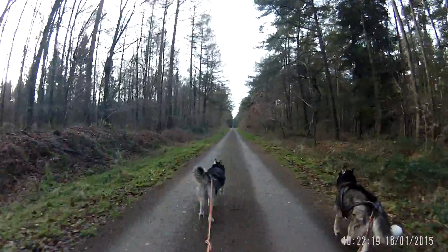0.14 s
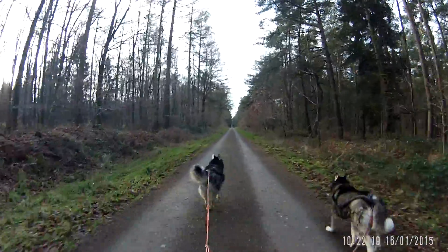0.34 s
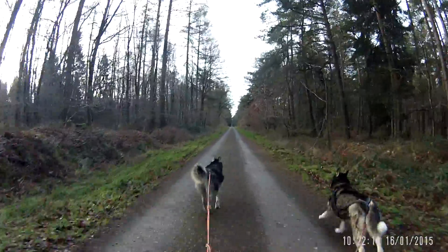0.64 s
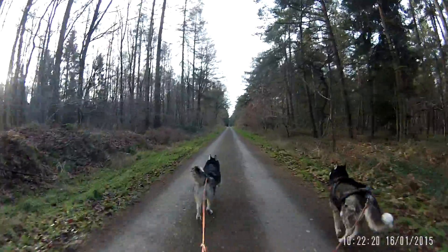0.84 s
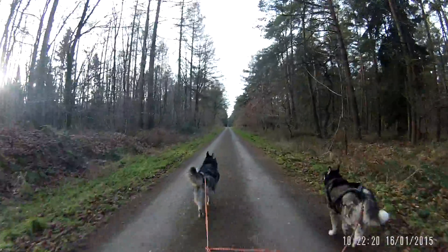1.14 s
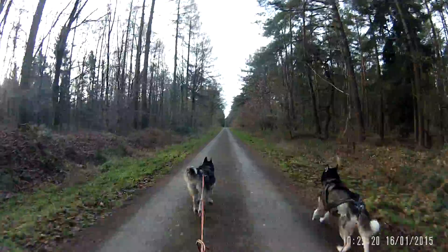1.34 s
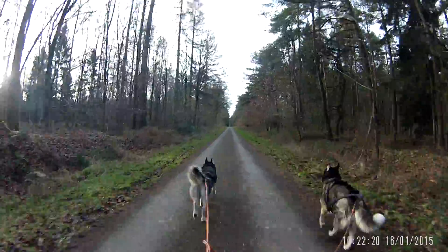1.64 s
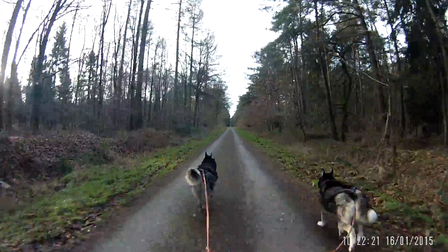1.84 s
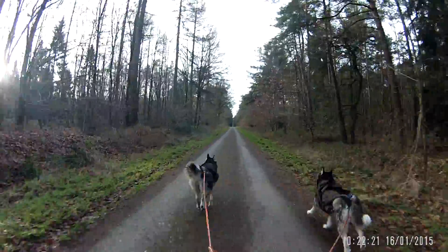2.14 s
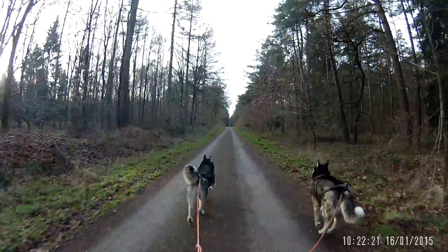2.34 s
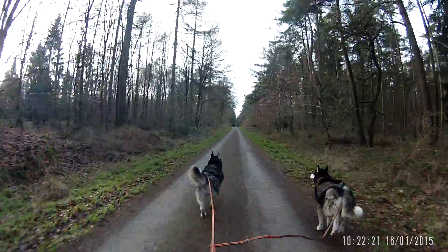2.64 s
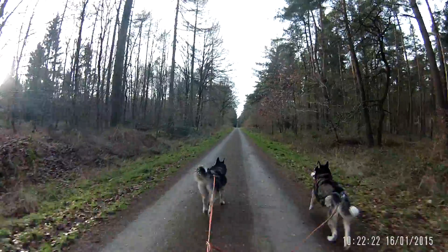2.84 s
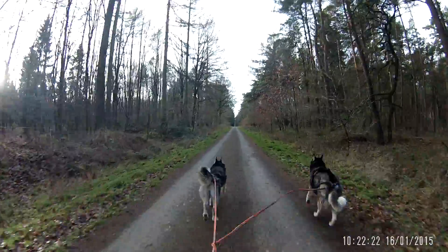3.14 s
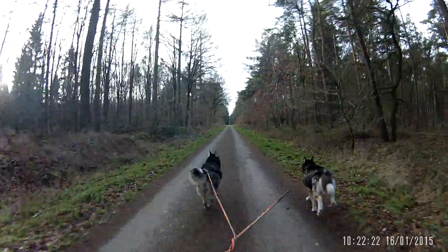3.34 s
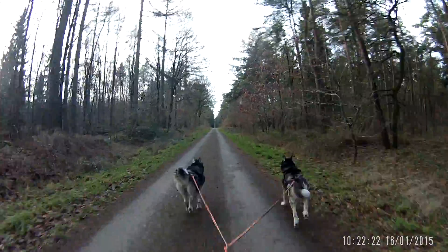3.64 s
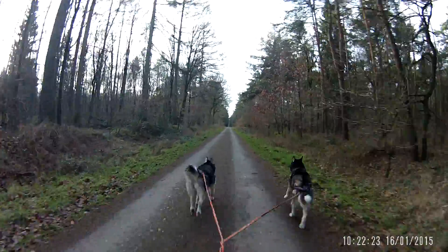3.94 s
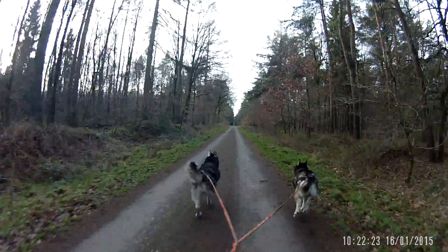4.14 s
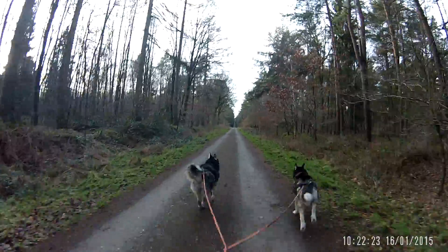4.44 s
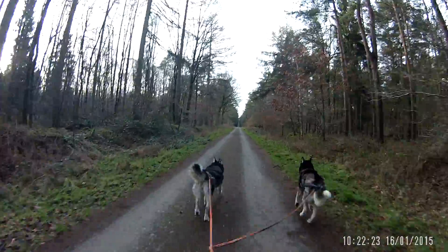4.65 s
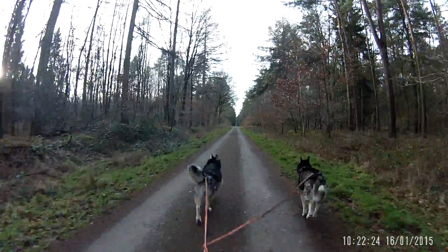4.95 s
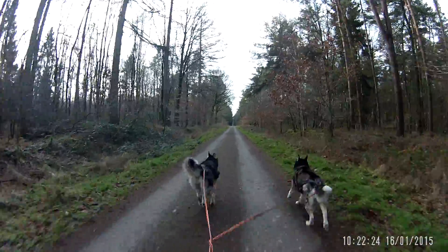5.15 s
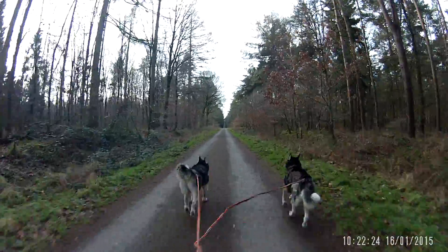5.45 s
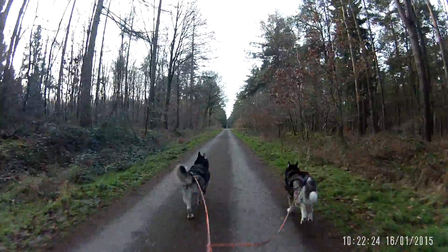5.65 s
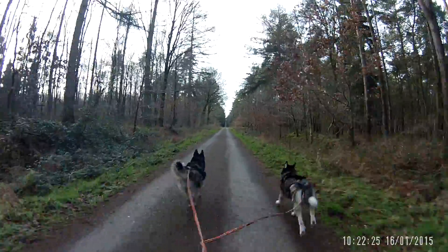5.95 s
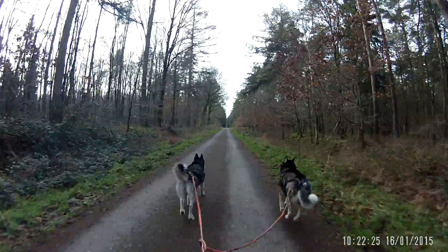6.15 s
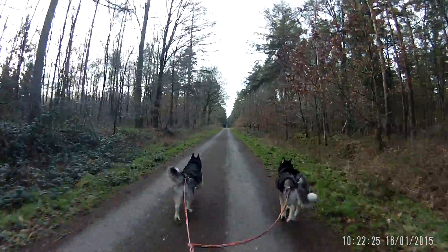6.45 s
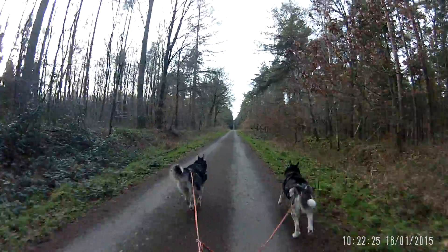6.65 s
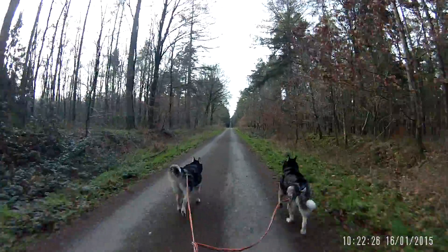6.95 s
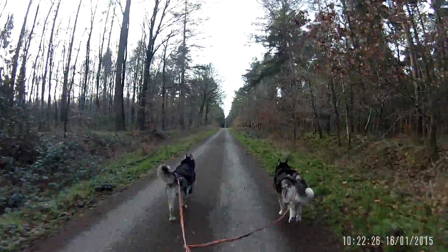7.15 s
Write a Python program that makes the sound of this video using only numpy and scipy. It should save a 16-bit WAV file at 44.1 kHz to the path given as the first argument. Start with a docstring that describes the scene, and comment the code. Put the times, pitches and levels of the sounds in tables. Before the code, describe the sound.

A scooter rolls along a gravelly track with a steady low frame rumble, constant loose plastic rattling, and occasional sharp stone pops.

```python
"""A kick scooter, pulled by two dogs along a fine gravel forest track: its frame rumbles as damped modes
shaken by random pebble contacts and timed bumps. Short pulses make grit, stones and crushed clumps.
A loose camera housing knocks through a damped shell spectrum; flung chips and a tow line clip ring metal
modes; shaped noise makes the wind. The camera port adds a null, and the camera hiss and a thin whine."""
import sys
import numpy as np
from scipy import signal
from scipy.fft import rfft, irfft
from scipy.io import wavfile
from scipy.ndimage import uniform_filter1d, map_coordinates

SR = 44100
rng = np.random.default_rng(int(sys.argv[2]) if len(sys.argv) > 2 else 0)


def to_wav(s):
    """Save 16-bit WAV."""
    ch = np.atleast_2d(s).T  # columns
    pcm = np.round(np.clip(ch, -1, 1) * 32767)  # PCM
    wavfile.write(sys.argv[1], SR, pcm.astype(np.int16))


N = 321930
TIME_S = np.arange(N) / SR

# track under the tyres: (time [s], relative rumble level [dB], relative crunch level [dB])
TRACK_STATE = [(0.02, -31.5, -49), (0.57, -30.5, -50.5), (1.72, -29, -48.5), (1.9, -30.5, -52),
               (4.68, -30, -50), (4.87, -30.5, -52.5), (5.82, -31, -52), (6.08, -30, -48.5),
               (6.32, -31, -52.5), (7.3, -31, -51.5)]
# modes of frame, tyres and mount: (frequency [Hz], width [Hz], relative level [dB])
FRAME_MODES = [(130.5, 4.3, -9.5), (142, 23, -10), (172.6, 11.8, -0.5), (266.8, 15.2, -2.5),
               (291.9, 30.5, -2), (312.2, 27.6, -2), (360, 23, -8.5), (436.5, 40, -9), (525, 80, -21.5)]
# hollows and humps that jolt the frame: (time [s], relative peak level [dB])
BUMPS = [(0.002, -12), (0.052, -19.5), (0.742, -19), (0.779, -13), (1.266, -15), (1.395, -16),
         (1.627, -16.5), (1.75, -21.5), (1.879, -18), (2.038, -15), (2.196, -14), (2.538, -16),
         (2.717, -12.5), (2.875, -15.5), (3.039, -17.5), (3.202, -13), (4, -19), (4.49, -13.5),
         (4.651, -11), (4.779, -21), (5.891, -12), (5.975, -12), (6.001, -18), (6.65, -16.5),
         (7.027, -11.5)]
# moments when the tyres run light: (time [s], load change [dB])
LULLS = [(0.14, -3.5), (0.53, -3), (1.21, -3), (1.83, -3.5), (1.98, -6), (2.45, -4.5), (3.66, -3.5),
         (4.06, -3), (4.38, -5), (4.86, -4), (5.83, -5), (6.25, -2), (6.8, -2.5), (7.15, -3.5)]
# dips that set the scooter bouncing: (time [s], peak level [dB])
BOUNCES = [(0.032, -33), (.45, -32), (0.95, -29), (2.24, -30.5), (3.041, -31.5), (3.42, -30),
           (3.929, -28.5), (4.53, -37), (5.709, -28), (6.64, -32.5)]
# spectrum of grit and sand: (frequency [Hz], relative level [dB])
CRUNCH_SPECTRUM = [(300, -32), (600, 9.5), (880, -0.5), (1100, 2.5), (1220, 5.5), (1380, -2.5),
                   (2100, -3.5), (3300, -5), (4100, -12.5), (5200, -10), (6050, -9.5), (6700, -18),
                   (9000, -24), (15000, -54)]
# spectrum of the wind: (frequency [Hz], relative level [dB])
WIND_SPECTRUM = [(10, -12), (25, -35), (50, -12), (100, 10), (220, -2), (480, 0), (650, -10.5),
                 (1000, -17.5), (3000, -41.5)]
# knocks of the housing in its play: (time [s], relative peak level [dB])
HOUSING_KNOCKS = [(0.011, -22.5), (0.053, -22.5), (0.098, -34), (0.1161, -27), (0.1816, -21), (0.2104, -14),
                  (0.2619, -14), (0.291, -29), (0.325, -16.5), (0.403, -28), (0.4582, -22), (0.471, -17),
                  (0.545, -22), (0.566, -32), (0.6404, -22.5), (0.6749, -22.5), (0.7002, -24.5),
                  (0.7421, -10.5), (0.755, -28), (0.7933, -27.5), (0.8776, -33.5), (0.925, -23),
                  (0.9605, -20.5), (0.9982, -21), (1.0308, -27), (1.076, -20.5), (1.1, -24), (1.143, -24.5),
                  (1.267, -21.5), (1.299, -25), (1.321, -27.5), (1.3649, -12.5), (1.3982, -19.5),
                  (1.4526, -22.5), (1.5972, -24), (1.672, -21), (1.7152, -22), (1.753, -23.5),
                  (1.8233, -26.5), (1.8996, -16.5), (1.9639, -28.5), (2.063, -23), (2.087, -22.5),
                  (2.1197, -24), (2.178, -17), (2.2987, -18), (2.405, -32), (2.4416, -26), (2.471, -20.5),
                  (2.5147, -32), (2.5882, -28.5), (2.6517, -18), (2.691, -31), (2.7447, -31.5),
                  (2.786, -34), (2.8847, -28), (2.9083, -15.5), (2.9711, -18), (3.015, -28), (3.0882, -21),
                  (3.1479, -15), (3.199, -21), (3.254, -24), (3.308, -19.5), (3.3416, -24), (3.3665, -15),
                  (3.4287, -16), (3.478, -22), (3.6355, -28.5), (3.693, -23), (3.745, -33), (3.788, -21),
                  (3.834, -20.5), (3.8831, -30), (3.9489, -19), (4.022, -29), (4.0582, -22.5), (4.107, -23),
                  (4.1427, -32), (4.258, -18), (4.3224, -22), (4.401, -20), (4.4403, -16.5),
                  (4.5027, -18.5), (4.53, -22.5), (4.585, -21), (4.7206, -17.5), (4.769, -18),
                  (4.805, -18.5), (4.8422, -22.5), (4.886, -33), (4.9482, -24.5), (4.9894, -28.5),
                  (5.1103, -19), (5.141, -22.5), (5.1876, -22.5), (5.251, -21), (5.3233, -28),
                  (5.3892, -15.5), (5.453, -13.5), (5.4976, -22.5), (5.5164, -30), (5.5538, -20),
                  (5.596, -29), (5.682, -22.5), (5.7209, -18), (5.7645, -30.5), (5.878, -27.5),
                  (5.972, -20.5), (6.0741, -33), (6.083, -33), (6.1452, -23.5), (6.1936, -25.5),
                  (6.288, -34), (6.3615, -30), (6.4083, -32), (6.4613, -28.5), (6.4926, -27),
                  (6.525, -34.5), (6.634, -27), (6.763, -26.5), (6.822, -21.5), (6.8606, -25.5),
                  (6.955, -26), (7.0894, -27), (7.1646, -30.5), (7.207, -25.5), (7.285, -30)]
# spectrum of the housing's clack: (frequency [Hz], relative level [dB])
CLACK_SPECTRUM = [(1500, -28), (3100, -23), (3370, -7), (3455, 5), (3530, -2), (3650, -7), (3755, 6),
                  (3850, 0), (4350, -3), (4960, 3), (5500, -2), (6300, -2), (6900, -8), (7500, -16),
                  (7970, -9), (8600, -19), (9500, -29), (10600, -29), (11700, -20), (12800, -22),
                  (13700, -36)]
# larger stones squeezed from under a tyre, before the rubber muffles them:
# (time [s], peak level [dB], pitch [Hz], envelope width [cycles])
LARGE_STONES = [(.04, -29, 2800, .6), (.352, -30, 2600, 0.55), (1.1933, -21, 1780, 0.18),
                (1.2718, -24.5, 1660, 0.23), (1.6672, -14, 2450, .38), (1.7677, -8.5, 2250, 0.35),
                (1.777, -26, 2110, .4), (2.008, -27.5, 2500, 0.43), (2.018, -29, 2400, 0.38),
                (2.159, -28.5, 2400, 0.43), (2.601, -25, 2720, 0.43), (3.5445, -21.5, 1850, 0.31),
                (4.0792, -24, 2410, 0.34), (4.166, -28, 2140, .4), (4.6114, -26.5, 2420, 0.34),
                (4.653, -25.5, 2020, 0.18), (5.157, -25.5, 1310, 0.47), (5.215, -25, 2050, 0.2),
                (5.809, -26.5, 2710, 0.51), (5.886, -23.5, 2540, 0.63), (5.891, -20, 2520, 0.6),
                (5.931, -27, 2600, .66), (5.965, -24.5, 2500, 0.55), (6.179, -27, 2500, 0.77),
                (6.8462, -22.5, 1734, 0.32), (7.0673, -27, 2230, 1.3), (7.213, -25.5, 2970, .54),
                (7.235, -24.5, 2150, 4.8)]
# clumps of gravel crushed under a tyre, and at 0.21 s and 0.47 s the low thuds of chips flung against the
# frame: (time [s], relative peak level [dB], decay [s], centre pitch [Hz])
CLUMPS = [(.209, -24.5, 0.014, 845), (.47, -25.5, 0.0098, 840), (.823, -29.5, 0.011, 1330),
          (1.387, -28.5, .012, 1290), (1.592, -20.5, 0.0097, 1950), (2.082, -22, 0.017, 1920),
          (3.204, -28, .012, 1330), (5.662, -21.5, 0.015, 1750), (6.008, -31, 0.019, 1050),
          (6.482, -24, 0.014, 1570)]
# chips flung against the scooter: (time [s], relative peak level [dB])
CHIP_HITS = [(0.2109, -18.5), (0.472, -26), (0.744, -18), (1.079, -16.5), (1.099, -28), (1.366, -25),
             (3.341, -25)]
# modes of the struck metal before detuning: (frequency [Hz], width [Hz], relative level [dB])
METAL_MODES = [(890, 210, -1), (6140, 150, 2.5), (7380, 100, -10), (7930, 110, 2.5), (9100, 110, -7)]
# spectrum of a chip's first contact: (frequency [Hz], relative level [dB])
CRACK_SPECTRUM = [(6000, 0), (15000, -18)]
# tinkles of the tow line's clip: (time [s], peak level [dB])
TINKLES = [(.84, -57), (3.095, -59), (3.45, -64), (7.215, -66)]

LULL_S, PRESS_S, PRESS_DB = 0.031, 0.02, 2.5  # lull half-length; time and gain of a bump's extra load
GRIT_SHARE = 0.4  # part of the load's dB swing that the crunch follows
TOUCH_GAP_S, TOUCH_DB = 0.04, -38  # typical gap and relative level of light touches between knocks
SMALL_STONES_PER_S, SMALL_STONE_DB, SMALL_STONE_HZ = 14, -38.5, 2460  # level and pitch are mid-range
PORT_NULL_HZ, WHINE_HZ, TOP_HZ = 5770, 10519, 15100


def undb(db):
    """Decibels to gain."""
    return 10 ** (np.asarray(db) / 20)


def level(x, rms_db):
    """Scale to an rms level."""
    return x * undb(rms_db) / np.sqrt(np.mean(x ** 2))


def add(out, at_s, sound, peak_db):
    """Mix in a short sound at a time and peak level."""
    start = int(np.clip(at_s * SR, 0, N - 1))
    scaled = sound * undb(peak_db) / np.abs(sound).max()
    out[start:start + len(sound)] += scaled[:N - start]


def spectrum_gain(points, size):
    """Gain per FFT bin, interpolated in dB over log frequency."""
    hz, db = np.transpose(points)
    bins_hz = np.maximum(np.fft.rfftfreq(size, 1 / SR), 1)
    return undb(np.interp(np.log(bins_hz), np.log(hz), db))


def colour(x, points):
    """Filter by a spectrum without shifting phase."""
    return irfft(rfft(x) * spectrum_gain(points, len(x)), len(x))


def ring(modes, size):
    """Damped modes; neighbours swing in opposite senses, so the sound takes a moment to build."""
    hz, width_hz, db = np.transpose(modes)[:, :, None]
    t = np.arange(size) / SR
    sense = (-1) ** np.arange(len(hz))[:, None]
    decay = np.exp(-np.pi * width_hz * t)
    return np.sum(sense * undb(db) * width_hz * decay * np.sin(2 * np.pi * hz * t), axis=0)


def grains(per_s, spread_db, size):
    """Random contacts: many small ones and a few large."""
    hits = rng.random(size) < per_s / SR
    force_db = spread_db * np.minimum(rng.exponential(size=size), 4)
    return hits * rng.standard_normal(size) * undb(force_db)


def ground():
    """Rumble and crunch gains: the track's state plus tyre load, raised after bumps and cut in lulls."""
    s, rumble_db, crunch_db = np.transpose(TRACK_STATE)
    t = TIME_S[::100]
    load_db = sum(PRESS_DB * np.exp(-((t - at) / PRESS_S - 0.5) ** 2) for at, _ in BUMPS)
    load_db = load_db + sum(db * np.exp(-((t - at) / LULL_S) ** 2) for at, db in LULLS)
    rumble = undb(np.interp(t, s, rumble_db) + load_db)
    crunch = undb(np.interp(t, s, crunch_db) + GRIT_SHARE * load_db)
    return np.interp(TIME_S, t, rumble), np.interp(TIME_S, t, crunch)


def frame(tyre_hz=490, evenness=0.99, rumble_db=2.0, bump_db=-4.5, bump_s=0.0028, drift_s=0.0015,
          jolt_hz=190):
    """Countless pebbles and a few bumps shake the frame through the soft, low-passing tyres."""
    tyre = signal.butter(7, tyre_hz, fs=SR, output="sos")
    body = signal.sosfilt(tyre, ring(FRAME_MODES, size=8192))
    pebbles = grains(1500, 1.4, size=N + 8191)
    shake = level(signal.fftconvolve(pebbles, body, "valid"), 0)
    # the shifting load bends the modes by a percent or two
    sway = uniform_filter1d(uniform_filter1d(rng.standard_normal(N), size=6000), size=6000)
    warped_s = TIME_S + drift_s * level(sway, 0)
    shake = map_coordinates(shake, [warped_s * SR], mode="mirror")
    # the rider's weight keeps the tyres pressed down: even out the shaking, then follow the ground
    shake /= uniform_filter1d(shake ** 2, size=3500) ** (evenness / 2)
    rumble, _ = ground()
    out = level(shake, rumble_db) * rumble
    t = np.arange(2048) / SR
    jolt_band = signal.butter(2, [jolt_hz, 2 * jolt_hz], "band", fs=SR)  # favours the middle modes
    for s, db in BUMPS:
        push = signal.lfilter(*jolt_band, rng.standard_normal(len(t)) * np.exp(-t / bump_s))
        add(out, s, signal.fftconvolve(push, body), db + bump_db)
    return out


def wheels(hz=69, width_hz=13, bounce_db=-42, build_s=0.071):
    """The lowest mode: the scooter's mass bounces on the air in its tyres."""
    lowpass = signal.butter(2, 2 * hz, fs=SR, output="sos")
    mode = ring([(hz, width_hz, 0)], size=8192)
    bounce = signal.fftconvolve(grains(400, 0.93, size=N + 8191), mode, "valid")
    out = level(signal.sosfilt(lowpass, bounce), bounce_db)
    t = np.arange(8192) / SR
    for s, db in BOUNCES:
        add(out, s, mode * (1 - np.exp(-t / build_s)) ** 2, db)
    return out


def snap(hz, cycles):
    """A Gaussian-enveloped sine pulse, centred 1 ms after its start."""
    turns = (np.arange(128) / SR - 0.001) * hz
    return np.exp(-(turns / cycles) ** 2 / 2) * np.sin(2 * np.pi * turns)


def gravel(crunch_db=2.0, patchy_db=2.5, per_s=170, spread_db=2.0, cycles=1.35, sand_db=-1):
    """Grit of nine sizes, each at its own pitch, crackles in small patches with a hiss of sand."""
    patches = level(uniform_filter1d(rng.standard_normal(N), size=900), 0)
    grit = np.zeros(N)
    for hz in np.geomspace(700, 3800, 9):
        crackle = signal.fftconvolve(grains(per_s, spread_db, size=N), snap(hz, cycles))[:N]
        grit += level(crackle, 0) * np.sqrt(hz)
    grit = level(colour(grit, CRUNCH_SPECTRUM), 0)
    sand = level(colour(rng.standard_normal(N), CRUNCH_SPECTRUM), sand_db)  # relative to the grit
    _, crunch = ground()
    return level((grit + sand) * undb(patchy_db * patches), crunch_db) * crunch


def wind(wind_db=-40.5, gust_db=-1.5):
    """The air of the ride flutters softly over the camera: shaped noise with random gusts."""
    gusts = level(uniform_filter1d(rng.standard_normal(N), size=6000), 0)
    air = colour(rng.standard_normal(N), WIND_SPECTRUM)
    return level(air * undb(gust_db * gusts), wind_db)


def impact(points, size):
    """Minimum-phase response of a heavily damped body with the given spectrum; peak 1."""
    cepstrum = irfft(np.log(spectrum_gain(points, size)))
    cepstrum[0], cepstrum[size // 2:] = 0, 0
    response = irfft(np.exp(rfft(2 * cepstrum)))
    return response / np.abs(response).max()


def touches(timing=0.25, scatter_db=3):
    """Light touches fill the pauses between knocks at a loose, steady pace: rows like the knocks."""
    rows = []
    for (start, _), (end, _) in zip(HOUSING_KNOCKS, HOUSING_KNOCKS[1:]):
        swings = max(round((end - start) / TOUCH_GAP_S), 1)
        chance = rng.uniform(-1.1, 1, size=(8, 2))
        for k, (late, force) in zip(range(1, swings), chance):
            at_s = start + (end - start) * (k + timing * late) / swings
            rows.append((at_s, TOUCH_DB + scatter_db * force))
    return rows


def housing(tick_db=-0.76, touch_db=-8, scrape_db=-23, seat_s=0.001099, chatter_db=-34,
            chatter_s=0.0075, scatter_db=1.1, top_hz=11000, hard_db=-20, octaves_per_db=0.28,
            mount_db=-20, mount_s=0.0075, rebound_s=0.0041, rebound_db=-15):
    """The housing touches, scrapes, seats, rebounds and chatters; harder is brighter, and jars the mount."""
    out, t = np.zeros(N), np.arange(1024) / SR
    mount_band = signal.butter(2, [900, 2800], "band", fs=SR)
    for s, db in list(HOUSING_KNOCKS) + touches():
        # the contact point shifts
        shifted = [(hz, gain_db + scatter_db * rng.standard_normal()) for hz, gain_db in CLACK_SPECTRUM]
        shell = impact(shifted, size=2048)
        seat = int(seat_s * SR * rng.uniform(1.0, 1.3))
        chatter = undb(chatter_db) * np.exp(-t / chatter_s)
        contacts = rng.standard_normal(len(t)) * np.where(t < seat / SR, undb(scrape_db), chatter)
        contacts[0] += undb(touch_db)
        contacts[seat] += 1
        rebound = seat + int(rebound_s * SR * (0.5 + rng.random()))
        contacts[rebound] += undb(rebound_db)
        cutoff_hz = min(top_hz * 2 ** (octaves_per_db * (db - hard_db)), SR / 3)
        contacts = signal.lfilter(*signal.butter(2, cutoff_hz, fs=SR), contacts)
        add(out, s, signal.fftconvolve(contacts, shell), db + tick_db)
        jar = signal.lfilter(*mount_band, rng.standard_normal(len(t)) * np.exp(-t / mount_s))
        add(out, s + seat_s, jar, db + mount_db)
    return out


def small_stones(scatter_db=5.5, octaves=0.67, cycles=0.87):
    """Small stones pop at random: rows like the larger ones."""
    rows = []
    for when, force, pitch in rng.random((200, 3))[:int(SMALL_STONES_PER_S * N / SR)]:
        peak_db = SMALL_STONE_DB + scatter_db * (2 * force - 1)
        hz = SMALL_STONE_HZ * 2 ** (octaves * (2 * pitch - 1))
        rows.append((when * N / SR, peak_db, hz, cycles))
    return rows


def stones(splinter_db=-25, splinter_s=0.015, top_hz=4000):
    """Each stone snaps free from under the tyre, and splinters follow."""
    out, t = np.zeros(N), np.arange(1024) / SR
    for s, db, hz, cycles in list(LARGE_STONES) + small_stones():
        contacts = grains(2100, 1.0, size=len(t)) * np.exp(-t / splinter_s) * undb(splinter_db)
        contacts[0] = 1
        add(out, s, signal.fftconvolve(contacts, snap(hz, cycles)), db)
    rubber = signal.butter(3, top_hz, fs=SR, output="sos")  # muffles the top
    return signal.sosfilt(rubber, out)


def crushes(crush_db=-1, octaves=0.6, cycles=0.3, fade_db=11, scatter_db=3.0, top_hz=3800,
            dust_db=-20, count=14):
    """A clump gives way, or a flung chip thuds on the frame: mixed impacts thin out and fade, with a spurt of
    fine dust."""
    out, dust, t = np.zeros(N), np.zeros(N), np.arange(2048) / SR
    for s, db, decay_s, hz in CLUMPS:
        for k in range(count):
            age = 2 * ((k + rng.random()) / count) ** 1.5  # in decay times
            pitch, force = np.clip(rng.standard_normal(2), -1.5, 1.5)
            peak_db = db + crush_db - fade_db * age + scatter_db * force
            add(out, s + age * decay_s, snap(hz * 2 ** (octaves * pitch), cycles), peak_db)
        spurt = rng.standard_normal(len(t)) * np.exp(-t / decay_s)
        add(dust, s, signal.fftconvolve(spurt, snap(top_hz, cycles / 2)), db + dust_db)
    return signal.sosfilt(signal.butter(3, top_hz, fs=SR, output="sos"), out) + dust


def chips(chip_db=-6.5, detune=0.022, crack_db=-9):
    """A flung chip cracks against the metal and rings its modes, detuned as each hits another spot."""
    out = np.zeros(N)
    for s, db in CHIP_HITS:
        modes = [(hz * (1 + detune * rng.standard_normal()), width_hz, gain_db)
                 for hz, width_hz, gain_db in METAL_MODES]
        ping = ring(modes, size=1024)
        add(out, s, ping, db + chip_db)
        crack = colour(ping ** 2 * rng.standard_normal(len(ping)), CRACK_SPECTRUM)
        add(out, s, crack, db + crack_db)
    return out


def line_clip(hz=9620, width_hz=25):
    """A small steel clip rings on one high mode."""
    out = np.zeros(N)
    for s, db in TINKLES:
        add(out, s, ring([(hz, width_hz, 0)], size=4096), db)
    return out


def scene():
    """Everything travels with the camera, close and dry."""
    rolling = frame() + wheels() + gravel() + wind()
    events = housing() + stones() + crushes() + chips() + line_clip()
    return (rolling + events)[None]


def record(dry, null_q=13, null_db=-17, hiss_db=-70.5, hiss_hz=13000, whine_db=-80):
    """The microphone port has one deep null; the camera adds faint hiss and a thin whine, and cuts the top."""
    heard = signal.lfilter(*signal.iirnotch(PORT_NULL_HZ, null_q, fs=SR), dry)
    heard += undb(null_db) * (dry - heard)  # limits the null's depth
    hiss = signal.lfilter(*signal.butter(2, hiss_hz, fs=SR), rng.standard_normal(N))
    whine = level(np.sin(2 * np.pi * WHINE_HZ * TIME_S), whine_db)
    own_noise = undb(hiss_db) * hiss + whine
    top_cut = signal.ellip(8, 0.2, 70, TOP_HZ, fs=SR, output="sos")
    return signal.sosfilt(top_cut, heard + own_noise)


dry = scene()
out = record(dry)
to_wav(out)
```